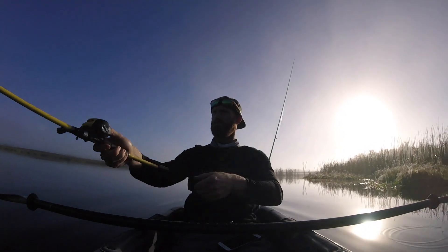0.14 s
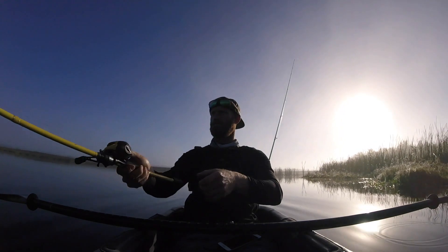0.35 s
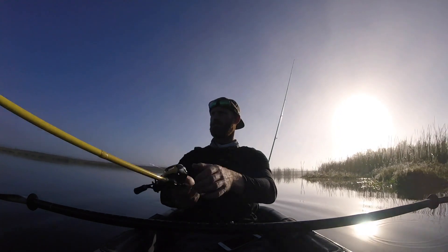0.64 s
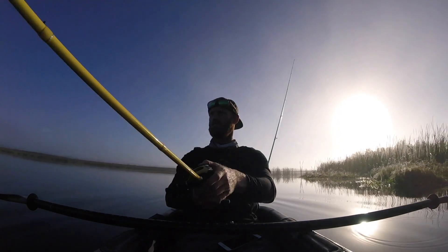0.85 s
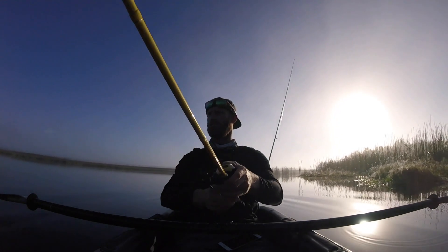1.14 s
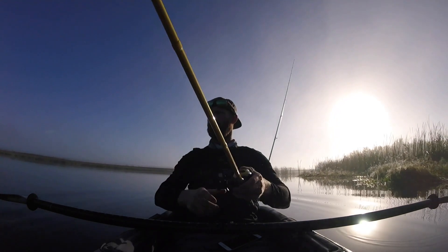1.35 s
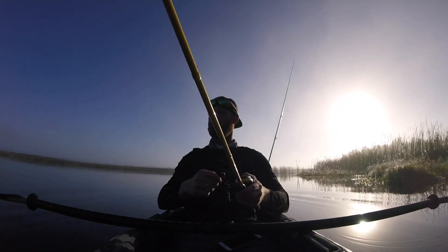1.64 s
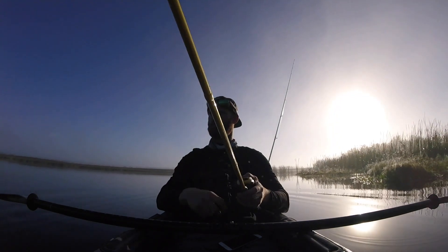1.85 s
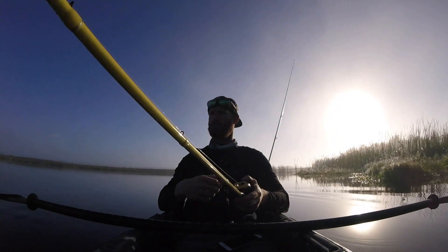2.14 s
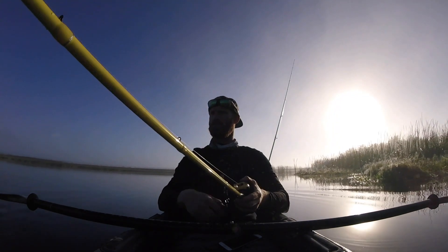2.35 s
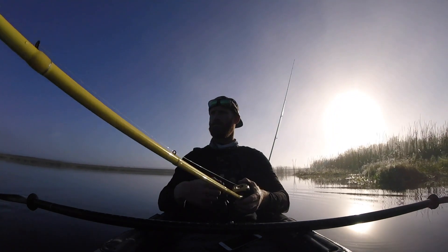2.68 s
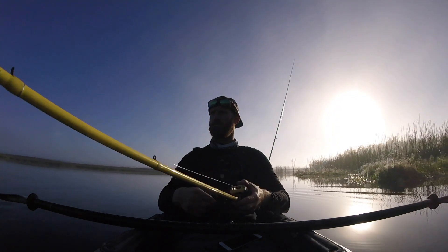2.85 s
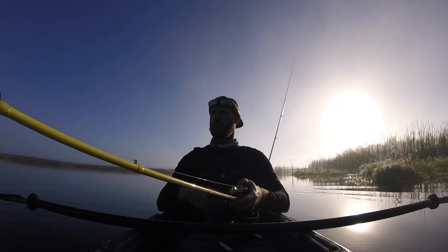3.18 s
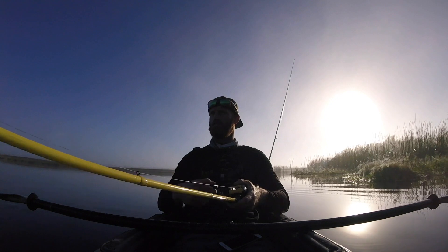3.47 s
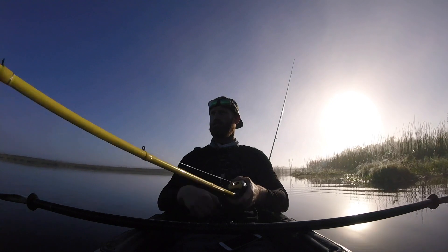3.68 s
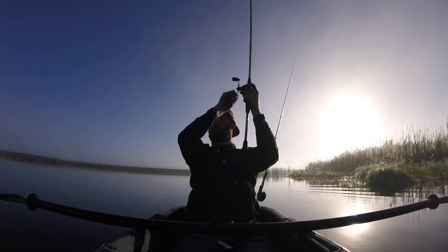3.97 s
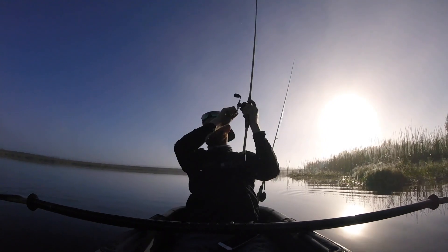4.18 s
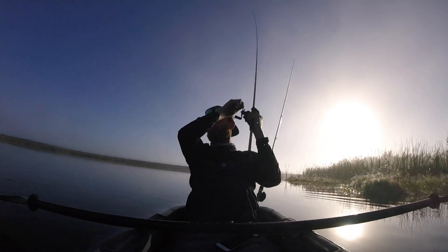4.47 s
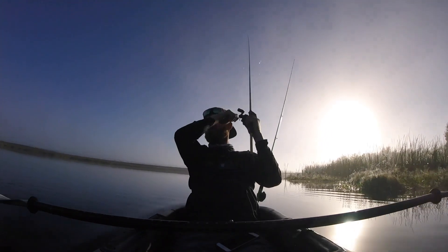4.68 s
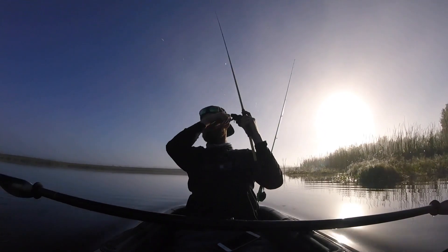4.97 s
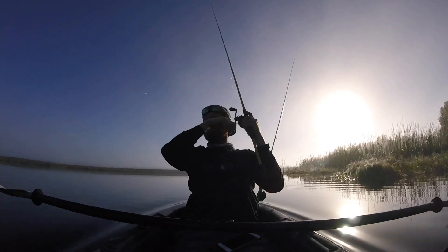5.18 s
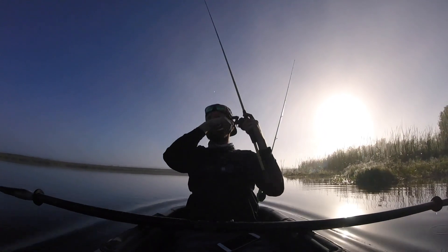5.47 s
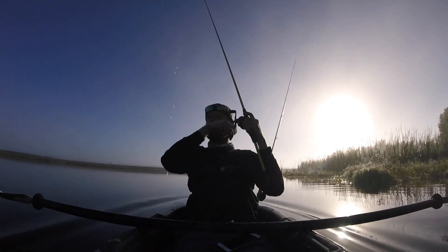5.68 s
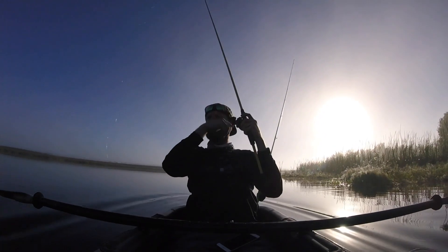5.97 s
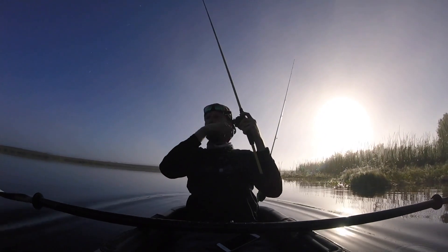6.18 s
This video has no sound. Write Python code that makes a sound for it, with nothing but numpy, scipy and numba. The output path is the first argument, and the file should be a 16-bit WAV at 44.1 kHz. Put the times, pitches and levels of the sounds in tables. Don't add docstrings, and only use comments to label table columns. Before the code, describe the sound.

Low motor hum and pulsing insect chorus on a quiet pond, with small tackle ticks, one crisp click, and a heavy clustered plastic hull thump.

```python
import sys
import numpy as np
from scipy import signal
from scipy.fft import rfft, irfft
from scipy.io import wavfile
from scipy.ndimage import uniform_filter1d
from numba import njit

SR = 44100
rng = np.random.default_rng(int(sys.argv[2]) if len(sys.argv) > 2 else 0)


def unload_audio(sound):
    columns = np.transpose(np.atleast_2d(sound))
    steps = np.round(np.clip(columns, -1, 1) * 32767)
    wavfile.write(sys.argv[1], SR, steps.astype(np.int16))


def level_to_linear(level):
    exponent = np.asarray(level, float) / 20
    return 10 ** exponent


N = 278712
TIME = np.arange(N) / SR


@njit
def svf(x, hz, width):
    y, b, l = np.empty(len(x)), 0., 0.
    g, k = np.tan(np.pi * hz / SR), width / hz
    for i in range(len(x)):
        v = (b + g * (x[i] + 1e-18 - l)) / (1 + g * (g + k))
        b, l, y[i] = 2 * v - b, l + 2 * g * v, k * v
    return y


def ring(x, modes):
    out = 0
    for k, (hz, width, db) in enumerate(modes):
        out = out + (-1) ** k * level_to_linear(db) * svf(x, 1. * hz, 1. * width)
    return out


def unit(x):
    return x / np.sqrt(np.mean(x ** 2))


def curve(rows, column=1):
    rows = np.asarray(rows)
    return np.interp(TIME, rows[:, 0], rows[:, column])


def walk(rate):
    hold = int(SR / rate)
    steps = np.repeat(rng.standard_normal(N // hold + 1), hold)
    return 1.3 * uniform_filter1d(uniform_filter1d(steps, hold), hold)[:N]


def coloured(shape):
    hz, db = np.transpose(shape)
    log_hz = np.log(np.arange(N // 2 + 1) * SR / N + 1)
    gain = level_to_linear(np.interp(log_hz, np.log(hz), db))
    return unit(irfft(rfft(rng.standard_normal(N)) * gain, N))


# [t/s, level/dB, push length/ms]
HULL_BLOWS = [(3.857, -28.5, 4.9), (4.008, -17.5, 3.2), (4.0168, -29, 2.4), (4.054, -27, 2.56),
              (4.08, -22, 8.8), (4.102, -24, 3), (4.123, -26.5, 1.9), (4.136, -20.5, 6.2),
              (4.143, -30, 1.85), (4.151, -13, 2.54), (4.1573, -10, 4.75), (4.167, -14.5, 4.3),
              (4.174, -22, 4)]
# [first t/s, gap/s, level/dB, push length/ms]
BUTT_ROCKING = [
    (4.024, 0.0081, -21, 7.1),
    (4.183, .0212, -18, 9.9),
]
# [f/Hz, width/Hz, level/dB]
HULL_MODES = [(49.4, 28, -14), (106, 33, -8), (151, 95, -7), (310, 31, 8.5), (425, 48, -9),
              (620, 150, -12.5)]


def blows():
    rocks = [(s + k * gap, db, ms) for s, gap, db, ms in BUTT_ROCKING for k in (0, 1, 2)]
    push = np.zeros(N)
    for s, db, ms in HULL_BLOWS + rocks:
        shape = np.hanning(int(ms * SR / 1000) + 2)
        i = int(s * SR)
        push[i:i + len(shape)] += level_to_linear(db) * shape
    mount = push - uniform_filter1d(push, size=700)
    return mount + ring(push, HULL_MODES)


# [t/s, peak level/dB, f/Hz, swell time/s]
HULL_WOBBLES = [(1.58, -49, 20, 0.094), (3.86, -40, 22, 0.036), (4.288, -36.5, 43, 0.031),
                (4.504, -28.5, 39, 0.018), (4.569, -29.5, 35, 0.0091), (4.621, -37, 21, 0.024),
                (4.809, -36, 40, 0.047), (4.842, -28, 36, 0.023), (4.96, -43, 18, 0.046),
                (5.311, -27, 42, 0.02), (5.39, -40, 51.6, 0.056), (5.458, -20.5, 38, 0.0094),
                (5.519, -29, 19.7, 0.019), (5.602, -36.5, 22, 0.038), (5.7, -42, 21, 0.014)]


def wobbles():
    out = np.zeros(N)
    for s, db, hz, swell_s in HULL_WOBBLES:
        t = np.clip(TIME - s, 0, None)
        swell = t / swell_s * np.exp(1 - t / swell_s)
        out += level_to_linear(db) * swell * np.sin(2 * np.pi * hz * t)
    return out


# [loudest t/s, level/dB]
GEAR_SHIFTS = [
    (3.85, -47),
    (4.018, -39.5),
    (4.129, -37),
    (4.52, -48),
]


def gear():
    rise_db_per_s, fall_db_per_s = 336, 161
    shift = 0
    for s, db in GEAR_SHIFTS:
        slope_db = np.minimum(rise_db_per_s * (TIME - s), fall_db_per_s * (s - TIME))
        shift = shift + level_to_linear(db + slope_db)
    return shift * unit(ring(rng.standard_normal(N), HULL_MODES))


def burst(start, db, hold_s, t60):
    t = TIME - start
    decay_db = -60 * np.clip(t - hold_s, 0, None) / t60
    return level_to_linear(db + decay_db) * np.clip(t / 0.0026, 0, 1)


# [t/s, level/dB, hold/s, dying t60/s]
BUTT_SLIDES = [
    (3.865, -65, 0.06, .012),
    (3.93, -54, 0.012, 0.072),
    (3.96, -70, 0.08, .012),
    (4.079, -54, 0.022, .012),
    (4.101, -43, .008, 0.077),
    (4.121, -42.5, .01, 0.13),
]
# [f/Hz, level/dB per Hz]
GRIT_COLOUR = [(350, -36), (600, -1), (821, -19.5), (2590, -12.5), (2980, -25), (4240, -12), (4710, -20),
               (5300, -13.5), (11000, -41), (13600, -75)]


def scrape():
    catching = level_to_linear(4 * walk(260))
    return sum(burst(*row) for row in BUTT_SLIDES) * coloured(GRIT_COLOUR) * catching


# [t/s, peak level/dB, middle ring level/dB, upper ring level/dB], rings against the peak
TACKLE_TICKS = [(0.8374, -61, -6, 0), (1.3932, -64, 2, 0), (1.466, -53, -4, 2), (1.5045, -55.5, 4, 3),
                (1.5343, -56, -6, -10), (1.6074, -56, -3, 2), (2.0394, -58, -7, -8), (3.6262, -56, -11, -8),
                (3.7793, -51.5, -1.5, -12), (3.8686, -52, -6, 1), (3.8834, -46.5, -2, 8),
                (3.8871, -40, -3, -7), (3.9374, -41, -2, 6), (3.9884, -54, -2, 2),
                (4.0816, -39.5, -16, -10), (4.1046, -45, 4, 6), (4.1324, -43, -12, -14),
                (4.5524, -42.5, -6.5, -3), (4.6154, -54.5, -1, -5), (4.8564, -58, -3, -8),
                (5.214, -46, -7, -2), (5.3657, -49, -2, -13), (5.4959, -57, -8, 6), (5.5288, -52, -19, 3),
                (5.726, -46, -9, -1), (5.8463, -48, -2, 3)]
# [t/s, peak level/dB, middle ring level/dB, upper ring level/dB, rattle length/ms]
REEL_ENGAGING = [
    (1.5818, -46, 0, 6, 3),
    (1.5835, -37, -4, 2, 0.8),
    (1.5848, -26, -3, 6, 1.3),
    (1.5868, -30, -2, 0, 2),
]
MORE_TICKS = [(1.2895, -57, 5, 11, 1.8), (1.556, -47, 1, -1, 1.2), (1.6, -53, 0, -1, 1.5),
              (4.1249, -45, 14, 5, 1.1), (4.147, -42, -11, -16, 1.4), (4.5, -57, -8, -12, 1),
              (4.659, -71, 10, -8, 1.1), (4.803, -49, -10, 6, 1.4)]
# [f/Hz, width/Hz, level/dB]
TICK_MODES = [
    [(760, 69, -4), (1130, 140, -9.5), (1630, 410, -13), (1980, 130, 0), (2750, 400, -2)],
    [(3500, 1130, -2.5), (4240, 170, 7), (4640, 1400, -3.5)],
    [(5770, 760, -10), (6270, 430, 3), (7440, 600, -11.5), (8980, 560, -19), (10100, 340, -15.5)],
]


def tackle(snap_db=8, tail_db=-23, tail_s=0.017, top_hz=11500):
    hard_snap_db, soft_attack_ms, tick_ms = 17.5, 0.83, 1.5
    drive = np.zeros((3, N))
    t = np.arange(4500) / SR
    taps = [(*row, tick_ms) for row in TACKLE_TICKS] + REEL_ENGAGING + MORE_TICKS
    grains = rng.standard_normal((len(taps), len(t)))
    for (s, db, mid_db, top_db, ms), grain in zip(taps, grains):
        rattle = np.exp(-t * 1000 / np.clip(ms, .2, 8))
        snap = grain * (rattle + level_to_linear(tail_db) * np.exp(-t / tail_s))
        if db > -32:
            snap[0] = level_to_linear(hard_snap_db)
        else:
            snap *= np.clip(t * 1000 / soft_attack_ms + .3, 0, 1)
            snap[int(soft_attack_ms * SR / 2000)] = level_to_linear(snap_db)
        if db < -41:
            snap = np.convolve(snap, [.3, .4, .3])[:len(t)]
        i = int(s * SR)
        drive[:, i:i + len(t)] += level_to_linear(db + np.array([[0], [mid_db], [top_db]])) * snap
    rings = level_to_linear(13.0) * sum(ring(x, modes) for x, modes in zip(drive, TICK_MODES))
    return signal.sosfilt(signal.butter(4, top_hz, fs=SR, output="sos"), rings)


# [t/s, nearness level/dB, fading of the fifth order level/dB]
ENGINE_APPROACH = [(0, -8.5, -2.5), (.6, -8, -1.5), (1.1, -7, -1), (1.7, -7, -5), (2.25, -6.5, 0.5),
                   (2.9, -5, -1.5), (3.7, -2.5, -4.5), (4.15, -4, 5.5), (4.55, -4, -1.5), (4.9, -2, 0.5),
                   (5.4, -0.5, 0), (6.32, 1, 2.5)]
# [t/s, turning f/Hz]
SHAFT_SPEED = [(0, 19.235), (6.32, 19.065)]
# [order of the turn, level/dB against the others, extra rise/dB per s as it nears]
SHAFT_ORDERS = [(3, -9.5, 1.5), (7, -14, -0.5), (8, -9.5, 0), (10, -5, 0.5), (11, -10.5, 2.5),
                (12, -13, 0.15), (13, -5.5, 0.16), (15, -18.5, 0.5), (16, -18, -0.5), (18, -13.5, 0.5)]
# [t/s, level/dB]
SECOND_MOTOR = [(0, -66), (.8, -70), (1.2, -68), (1.7, -63.5), (2.3, -67), (2.6, -80), (4.5, -86),
                (6.32, -68)]
# [f/Hz, level/dB per Hz]
LOW_ROAR = [(30, -20), (50, -9), (70, 0.5), (120, -6.5), (240, -8), (330, -10), (430, -14), (800, -15),
            (1200, -23), (2000, -31.5), (4000, -42.5), (5500, -72)]
# [f/Hz, level/dB per Hz]
HIGH_ROAR = [(300, -18), (500, -6.5), (900, -2), (1700, 2.5), (2300, -12), (3500, -16), (5000, -61)]


def engine(shimmer_db=1.5):
    turn = 2 * np.pi * np.cumsum(curve(SHAFT_SPEED)) / SR
    nearness_db = curve(ENGINE_APPROACH)

    def heard(db, slope):
        return level_to_linear(db + slope * nearness_db)

    starts = rng.uniform(0, 2 * np.pi, len(SHAFT_ORDERS))
    orders = 0
    for (order, db, rise), start in zip(SHAFT_ORDERS, starts):
        gain = level_to_linear(db + rise * (TIME - 6.5) + shimmer_db * walk(1.46))
        orders = orders + gain * np.sin(round(order) * turn + start)
    firing = level_to_linear(curve(ENGINE_APPROACH, column=2)) * np.sin(5 * turn)
    whine = level_to_linear(curve(SECOND_MOTOR)) * np.sin(2 * np.pi * 629.5 * TIME)
    tones = heard(-44.5, 0.85) * firing + heard(-43.5, 1.37) * orders + whine
    roar = heard(-47.5, 0.81) * coloured(LOW_ROAR) + heard(-61, 2.14) * coloured(HIGH_ROAR)
    return np.sqrt(2) * tones + level_to_linear(0.9 * walk(11)) * roar


# [t/s, length/s, start f/Hz, end f/Hz, level/dB]
BIRD_WHISTLES = [(1.75, .035, 2850, 2800, -76), (1.945, .03, 5800, 7350, -68),
                 (2.235, .037, 7100, 7500, -71), (4.03, .028, 6900, 7350, -72), (3.5, .06, 4080, 4050, -75),
                 (3.63, .03, 3120, 3080, -75), (5.55, .04, 3000, 2650, -73), (5.75, .298, 4250, 4215, -69),
                 (6.16, .018, 6200, 5500, -66), (6.19, .17, 5130, 4960, -66),
                 (6.272, .028, 6700, 7250, -70)]


def birds():
    swell_db_per_s, echo_s, echo_db = 28, 0.17, -14
    out = np.zeros(N)
    for start, length, from_hz, to_hz, db in BIRD_WHISTLES:
        u = np.clip((TIME - start) / length, 0, 1)
        bend = .45 if to_hz > from_hz else 1
        hz = from_hz + (to_hz - from_hz) * u ** bend
        swell_db = swell_db_per_s * length * (u - .6)
        envelope = level_to_linear(db + swell_db) * np.sin(np.pi * u) ** 0.12
        out += np.sqrt(2) * envelope * np.sin(2 * np.pi * np.cumsum(hz) / SR)
    lag = int(echo_s * SR)
    return out + level_to_linear(echo_db) * np.pad(out, (lag, 0))[:N]


def chorus(hz, spread_hz, width_hz, beat_hz, depth, count=6):
    out = 0
    for pitch, pace, start in rng.standard_normal((count, 3)):
        stroke = 2 * np.pi * beat_hz * (1 + 0.02 * pace) * TIME + 3 * start
        gate = (1 + depth * np.sin(stroke)) * (1 + depth * np.sin(3 * stroke))
        wing = (hz + spread_hz * pitch, 1. * width_hz)
        out = out + level_to_linear(walk(3.5)) * svf(svf(gate * rng.standard_normal(N), *wing), *wing)
    return unit(out)


def throb(depth_db=5.5, rise=.15, hold=.45):
    period_s, start_s = .342, .286
    u = (TIME - start_s) / period_s % 1
    return level_to_linear(depth_db * (np.interp(u, [0, rise, hold, 1], [0.93, 0.84, 0.57, 0.38]) - 0.94))


# [t/s, level/dB]
LOW_CHORUS = [(0, -67.5), (.5, -67), (1.2, -67.5), (2.05, -67.5), (2.5, -67.5), (2.9, -67.5), (3.6, -68.5),
              (5, -66.5), (6.32, -67)]


def insects():
    low = chorus(hz=4967, spread_hz=100, width_hz=500, beat_hz=65.0, depth=0.21)
    high = chorus(hz=6177, spread_hz=85, width_hz=410, beat_hz=47.5, depth=0.12)
    return level_to_linear(curve(LOW_CHORUS)) * throb() * low + level_to_linear(-72.5) * high


# [f/Hz, level/dB per Hz]
MARSH_HISS = [(1500, -22), (2500, -6.5), (4000, -12), (5600, -12), (6500, 1.5), (7500, -2), (8900, -5),
              (9800, -13), (11300, -8.5), (12500, -10), (13700, -20)]


def hiss():
    return level_to_linear(-72) * coloured(MARSH_HISS)


# [f/Hz, level/dB per Hz]
WATER_SWAY = [(8, -19), (15, 6), (30, 8), (55, 7), (80, -37)]


def sway():
    return level_to_linear(-60) * coloured(WATER_SWAY)


def duck():
    since = np.clip(TIME - 4.1, 0, None)
    attack_s, recover_s = 0.019, 1.44
    return level_to_linear(-5.5 * (1 - np.exp(-since / attack_s)) * np.exp(-since / recover_s))


def scene():
    close = blows() + wobbles() + gear() + scrape() + tackle()
    marsh = level_to_linear(0.9) * duck() * (insects() + hiss())
    return (close + engine() + birds() + marsh + sway())[None]


# [f/Hz, open threshold level/dB, shut threshold level/dB], over each line's usual size
TREBLE_GATE = [(3000, -30, -30), (3900, -6, -6), (4500, -30, -30), (8300, -14, -14), (9700, 1, 1),
               (11200, -1, -1), (12000, 1, 2), (12600, 3, 9), (13000, 4, 16), (13700, 8, 24)]


def gate_treble(x):
    hz, s, lines = signal.stft(x, SR, window="cosine", nperseg=1536)
    edge_hz, open_db, shut_db = np.transpose(TREBLE_GATE)
    is_open = 1. * (s > 1.58) * (s < 3.95)
    gate_db = np.outer(np.interp(hz, edge_hz, open_db), is_open)
    gate_db += np.outer(np.interp(hz, edge_hz, shut_db), 1 - is_open)
    usual = np.median(abs(lines), axis=-1, keepdims=True)
    keep = abs(lines) > level_to_linear(gate_db) * usual
    return signal.istft(lines * keep, SR, window="cosine", nperseg=1536)[1][:, :N]


def top_cut(x):
    return signal.sosfilt(signal.butter(12, 13700, fs=SR, output="sos"), x)


def record(dry):
    mix = gate_treble(dry)
    return top_cut(mix)


dry = scene()
out = record(dry)
unload_audio(out)
```